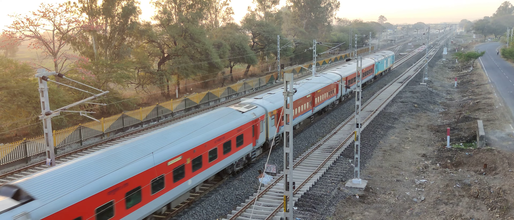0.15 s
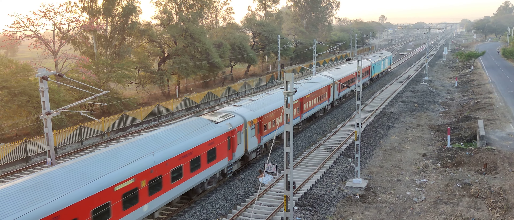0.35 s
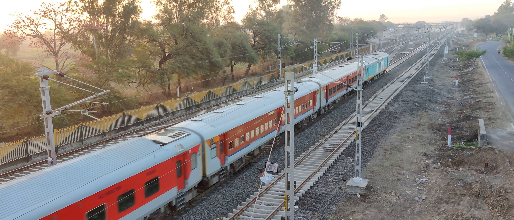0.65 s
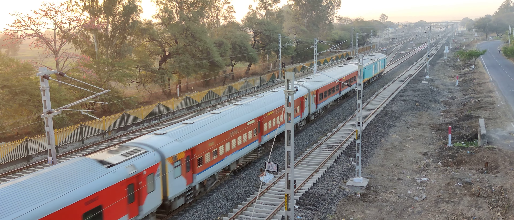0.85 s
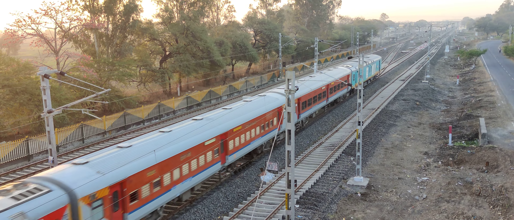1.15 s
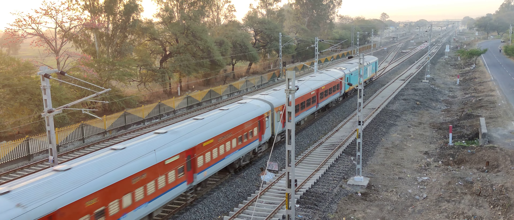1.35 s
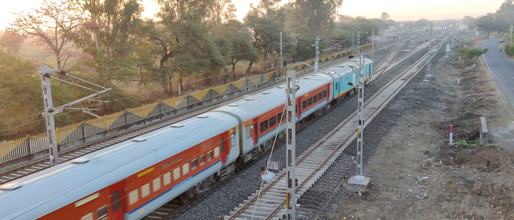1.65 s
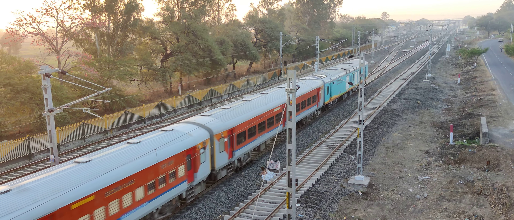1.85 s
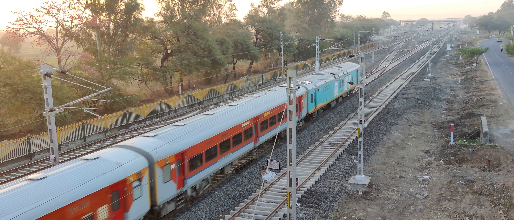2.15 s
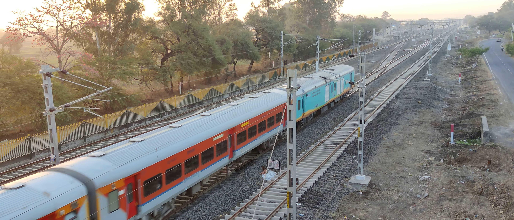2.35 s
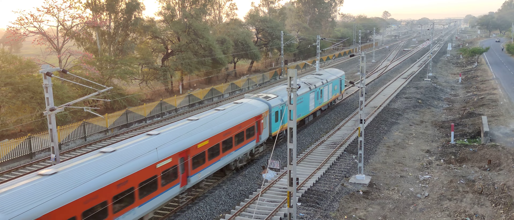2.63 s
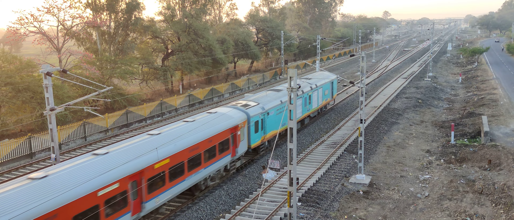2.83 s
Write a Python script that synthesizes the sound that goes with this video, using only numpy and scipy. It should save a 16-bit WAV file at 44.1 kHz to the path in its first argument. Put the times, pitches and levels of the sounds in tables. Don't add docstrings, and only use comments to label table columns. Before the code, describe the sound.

Continuous train rolling noise, deep rumble under rough steel hiss, with irregular paired wheel clacks and rattling throughout, swelling a little past two seconds, then easing; open air, heard from above on a phone.

```python
import sys
import numpy as np
from scipy import signal
from scipy.fft import rfft, irfft
from scipy.io import wavfile
from scipy.ndimage import uniform_filter1d

SR = 44100
rng = np.random.default_rng(int(sys.argv[2]) if len(sys.argv) > 2 else 0)


def gain_from_db(level_db):
    decades = np.asarray(level_db, float) / 20
    return 10 ** decades


def store_pcm(level_fs):
    pcm = np.round(np.clip(level_fs, -1, 1) * 32767).astype(np.int16)
    wavfile.write(sys.argv[1], SR, np.atleast_2d(pcm).T)


N = 131859
PORT_LAG_S = 0.00104


def curve(table, col):
    points = np.array(table, float)
    return np.interp(np.arange(N) / SR, points[:, 0], points[:, col])


def unit(x):
    return x / np.sqrt(np.mean(x ** 2))


def ring(x, hz, width):
    return signal.lfilter(*signal.iirpeak(hz, hz / width, fs=SR), x)


def colour(x, table, share=1):
    points = np.array(table, float)
    hz = np.fft.rfftfreq(N, 1 / SR) + 1
    level_db = np.interp(np.log(hz), np.log(points[:, 0]), points[:, 1])
    return irfft(rfft(x) * gain_from_db(np.multiply.outer(share, level_db)), N)


def walk(rate):
    hold = int(SR / rate)
    steps = np.repeat(rng.standard_normal(N // hold + 1), hold)
    return 0.88 * uniform_filter1d(uniform_filter1d(steps, hold), hold)[:N]


def ports(noise, like, lag_s=0):
    like = np.clip(like, -1, 1)
    shared = np.sqrt((1 + like) / 2) * noise[0]
    opposed = np.sqrt((1 - like) / 2) * noise[1]
    return np.array([np.roll(shared + opposed, int(lag_s * SR)), shared - opposed])


def port_noise(table, like):
    return unit(colour(ports(rng.standard_normal((2, N)), like, PORT_LAG_S), table))


def body(table, drive, flicker_db, rate, grit_db):
    out = 0
    for hz, width, db, like in table:
        rough = rng.standard_normal((2, N)) * gain_from_db(grit_db * rng.standard_normal(N))
        lag_s = PORT_LAG_S * (1150 < hz < 1500)
        rough = ports(unit(rough), like, lag_s) * gain_from_db(flicker_db * walk(rate)) * drive(hz)
        rung = ring(ring(rough, hz, 1.29 * width), hz, 1.29 * width)
        out = out + gain_from_db(db) * np.sqrt(SR / width / 4) * rung
    return out


def thuds(table, db, rise_s, fall_s, pair=1.17):
    events = np.array(table, float)
    start_s, level_db, pitch_hz = events[:, :1], events[:, 1:2], events[:, 2:]
    age_s = np.maximum(np.arange(N) / SR - start_s + rise_s, 0)
    phase = rng.random((len(events), 2)) * 2 * np.pi
    tone = np.sin(2 * np.pi * pitch_hz * age_s + phase[:, :1])
    tone = tone + 0.37 * np.sin(2 * np.pi * pair * pitch_hz * age_s + phase[:, 1:])
    envelope = (1 - np.exp(-age_s / rise_s)) ** 2 * np.exp(-age_s / fall_s)
    return np.sum(gain_from_db(level_db + db) * envelope * tone, axis=0) * 2


# start_s [s], level_db [dB], deep_db [dB], bright_db [dB]
LOAD_CURVE = [
    (0, -25.5, 0.5, 1),
    (.45, -24, -2.5, 0.5),
    (.9, -23.5, -5.5, 3),
    (1.25, -22, -1.5, 2),
    (1.65, -21, 0.5, 3),
    (2.15, -19, -2, 2),
    (2.36, -23, -1, 1.5),
    (2.99, -24.5, 2.5, 1),
]


def rolling_load():
    load = curve(LOAD_CURVE, 1)
    swing = load - np.mean(load)
    deep = curve(LOAD_CURVE, 2) - 0.22 * swing
    high = np.mean(load) + 0.11 * swing + curve(LOAD_CURVE, 3)
    return load, deep, high


# pitch_hz [Hz], width_hz [Hz], level_db [dB], likeness of ports [0-1]
TRACK_MODES = [(30.2, 8, -8, 0.96), (64.9, 12.7, -4, 1), (95, 48, -6.5, 0.98), (133, 94, -3.5, 1),
               (210, 69.5, 0.5, 0.99), (250, 51, -11.5, 0.83), (412, 108, -0.5, 0.97),
               (506.5, 139, -1, 0.96), (617, 100, -11, .93)]


def track_rumble(load, deep, jolts):
    def drive(hz):
        level = gain_from_db(load - 3 + (hz < 110) * deep)
        return level * (jolts if hz > 440 else 1)
    return body(TRACK_MODES, drive, 1.77, 8.9, 3.6)


# start_s [s], level_db [dB], knock_db [dB rel level], hiss_db [dB rel level]
AXLE_CLACKS = [(0.2117, -19, 0, -17), (0.3406, -19, -2.5, -16.5), (0.4874, -40.5, 4, -1),
               (0.5467, -32, 1.5, -9), (0.6818, -27.5, 0.5, -9), (0.7309, -29, 3, -16),
               (0.814, -23.5, -12, -14.5), (1.0041, -28, 3, -16), (1.1543, -27, -5, -17.5),
               (1.2865, -30.5, -0.5, -27), (1.4506, -22, 0, -13), (1.5127, -35, 6, -5.5),
               (1.5858, -27, -1.5, -10), (1.7799, -36.5, 7, -5.5), (1.868, -40, -6.5, -9),
               (1.923, -21.5, -1, -14.5), (2.0524, -26, -3, -6), (2.2414, -27, -2, -14.5),
               (2.3812, -42, 5, -12), (2.6953, -17, -6, -16.5), (2.822, -18.5, -6, -15.5)]


def blows(share, db, lead_s, rise_s, fall_s, tail_s, tail_db):
    clacks = np.array(AXLE_CLACKS, float)
    peak_db = clacks[:, 1] + db
    if share:
        peak_db = peak_db + clacks[:, {"knock": 2, "hiss": 3}[share]]
    age_s = np.arange(N) / SR - (clacks[:, :1] - lead_s)
    swell = np.exp(np.minimum(age_s, 0) / rise_s) * (1 + gain_from_db(tail_db))
    fall = np.exp(-(age_s / fall_s) ** 2) + gain_from_db(tail_db) * np.exp(-np.abs(age_s) / tail_s)
    shape = np.where(age_s < 0, swell, fall)
    return np.sqrt(np.sum((gain_from_db(peak_db)[:, None] * shape) ** 2, axis=0))


# pitch_hz [Hz], width_hz [Hz], level_db [dB], likeness of ports [0-1]
RAIL_MODES = [(768, 146, 2.5, 0.86), (928, 114, -1.5, 0.79), (1034, 62, -3.5, 0.23), (1350, 250, -8, 0.94)]


def rail_knock(high, jolts):
    knock = blows("knock", -9, 0.0051, 0.019, 0.014, 0.12, -1)
    return body(RAIL_MODES, lambda hz: (gain_from_db(high - 14.5) + knock) * jolts, 1.96, 25.06, 4.6)


# pitch_hz [Hz], width_hz [Hz], level_db [dB], likeness of ports [0-1]
WHEEL_MODES = [(1900, 150, -4, 0.8), (1706, 230, -9.5, 0.5), (2500, 150, -9, 0.27), (2741, 140, -9.5, 0.99),
               (3136, 127, -8.5, 0.5), (3988, 170, -10.5, 0.51), (4490, 420, -14, 0.17),
               (5440, 140, -18.5, .5), (5600, 130, -15, .6), (6190, 500, -11.5, 0.2), (6500, 280, -39, .4)]


def wheel_ring(high, treble_jolts):
    clack = blows(None, -12.5, 0.0028, 0.0059, 0.015, 0.13, -1.2)
    return body(WHEEL_MODES, lambda hz: (gain_from_db(high - 20.5) + clack) * treble_jolts, 1.8, 30.14, 2.5)


# pitch_hz [Hz], level_db [dB]
TREAD_SPECTRUM = [(1000, 2), (2000, -1.5), (3500, -0.5), (5500, -5.5), (7000, -13), (8300, -13),
                  (9000, -62)]


def tread_hiss(high, treble_jolts):
    spray = blows("hiss", -7, 0.0096, 0.0043, 0.055, 0.12, 2.5)
    return port_noise(TREAD_SPECTRUM, 0.36) * (gain_from_db(high - 18.5) + spray) * treble_jolts


# start_s [s], level_db [dB], pitch_hz [Hz]
RIM_PINGS = [(0.1964, -28, 1840), (0.2134, -20.5, 2032), (0.2184, -19, 1893), (0.3401, -26.5, 1900),
             (0.3584, -21.5, 1860), (0.5467, -29, 1880), (0.6439, -33, 1900), (0.6818, -23.5, 1870),
             (0.7322, -26, 1960), (0.814, -23.5, 1980), (0.8485, -27, 1900), (1.0066, -30, 1880),
             (1.1568, -29.5, 1920), (1.2885, -35.5, 1950), (1.4506, -21, 1955), (1.5124, -31, 1990),
             (1.5843, -17.5, 1874), (1.6427, -24, 1860), (1.8844, -28, 1810), (1.922, -18, 1853),
             (2.0537, -22, 1840), (2.6874, -21, 1960), (2.6973, -18.5, 1900), (2.7644, -28, 1884),
             (2.822, -26, 1900)]


def rim_pings():
    pings = np.array(RIM_PINGS, float)
    age_s = np.arange(N) / SR - pings[:, :1]
    envelope = np.sum(gain_from_db(pings[:, 1:2] - 1) * (age_s > 0) * np.exp(-np.abs(age_s) / 0.0052), axis=0)
    crack = envelope * ports(rng.standard_normal((2, N)), 0.49)
    for _ in range(3):
        crack = ring(crack, 3360, 4000)
    return thuds(RIM_PINGS, -2, 0.00148, 0.0044, 1.06) + colour(crack, TREAD_SPECTRUM)


# start_s [s], level_db [dB], pitch_hz [Hz]
RAIL_TAPS = [(0.055, -19.5, 570), (0.171, -15, 720), (0.209, -14.5, 900), (0.279, -16, 607),
             (0.344, -24, 687), (0.381, -11.5, 775), (0.52, -14.5, 812), (0.817, -19, 558),
             (0.87, -17, 797), (0.993, -12, 535), (1.01, -11.5, 768), (1.086, -19, 577), (1.102, -15, 720),
             (1.15, -13.5, 751), (1.288, -20, 710), (1.378, -22, 584), (1.441, -19.5, 582),
             (1.521, -21.5, 716), (1.557, -21.5, 590), (1.583, -12, 743), (1.625, -13, 656),
             (1.672, -20.5, 728), (1.766, -16.5, 742), (1.871, -12.5, 518), (1.896, -20, 828),
             (1.919, -16.5, 782), (2.052, -13, 711), (2.139, -19, 556), (2.196, -20, 534),
             (2.243, -9.5, 562), (2.306, -22.5, 584), (2.532, -24.5, 770), (2.589, -24, 800),
             (2.664, -15, 785), (2.691, -18, 1049), (2.814, -11, 933), (2.888, -16.5, 602)]


def rail_taps():
    return thuds(RAIL_TAPS, -5, 0.00154, 0.0061)


# start_s [s], level_db [dB], pitch_hz [Hz]
SLEEPER_THUDS = [(0.263, -17, 449), (0.328, -13.5, 507), (0.388, -11.5, 497), (0.42, -13, 438),
                 (0.531, -7.5, 466), (0.764, -15.5, 500), (0.847, -15.5, 396), (1.02, -14, 421),
                 (1.127, -12, 428), (1.271, -6, 401), (1.338, -17.5, 377), (1.41, -5.5, 418),
                 (1.479, -18, 472), (1.508, -15.5, 537), (1.775, -17, 363), (1.822, -15, 536),
                 (1.871, -18, 538), (1.911, -12, 498), (1.96, -8.5, 430), (2.108, -7, 427),
                 (2.193, -33, 510), (2.743, -16, 491), (2.868, -17.5, 444)]
# start_s [s], level_db [dB], pitch_hz [Hz]
BOGIE_BUMPS = [(0.049, -13.5, 201), (0.145, -19.5, 195), (0.463, -12.5, 210), (0.516, -25, 211),
               (0.67, -21.5, 197), (0.935, -22.5, 195), (1.004, -19, 187.6), (1.158, -10, 180.5),
               (1.301, -15, 191), (1.497, -18, 180), (1.671, -13.5, 244), (1.746, -11.5, 170),
               (2.044, -10.5, 235), (2.203, -9.5, 206.5), (2.523, -13.5, 217), (2.585, -16.5, 242),
               (2.754, -33, 187), (2.919, -25, 239)]
# start_s [s], level_db [dB], pitch_hz [Hz]
FLOOR_BOOMS = [(0.052, -27.5, 68), (0.332, -19, 41.4), (0.509, -18.5, 63), (0.763, -15, 61.3),
               (1.013, -14, 72.6), (1.101, -19.5, 75), (1.306, -19.5, 115), (1.625, -30, 65.6),
               (1.796, -20, 62.2), (2.258, -20.5, 96.7), (2.437, -13, 78), (2.674, -36, 79)]


def dull_blows():
    sleepers = thuds(SLEEPER_THUDS, 0.5, 0.00304, 0.0062)
    bogies = thuds(BOGIE_BUMPS, -4.5, 0.00796, 0.022)
    floors = thuds(FLOOR_BOOMS, -4.5, 0.015, 0.028)
    return sleepers + bogies + floors


# pitch_hz [Hz], level_db [dB]
SCRAPE_SPECTRUM = [(3500, -13.5), (5200, -4.5), (6500, -3.5), (7200, -13), (8300, -9), (8800, -55.5)]


def flange_scrape():
    return port_noise(SCRAPE_SPECTRUM, 0.63) * blows("hiss", -6, 0.035, 0.0011, 0.078, 0.08, -10)


def rattle():
    per_s, decay_s, level_db = 90, 0.003, -10
    jolt = (rng.random(N) < per_s / SR) * rng.exponential(size=N)
    return unit(1 + gain_from_db(level_db) * signal.lfilter([1], [1, -np.exp(-1 / (decay_s * SR))], jolt))


# pitch_hz [Hz], level_db [dB]
AIR_SPECTRUM = [(8000, -23), (8500, -1.5), (8900, -9), (11000, -9), (12500, -10), (13000, -31.5)]
# start_s [s], level_db [dB], length_s [s]
FLANGE_SQUEAKS = [(.21, -68, 0.043), (.33, -71, .04), (0.494, -59.5, .06), (.67, -72, .04), (.81, -69, .04),
                  (1.43, -73, .04), (1.57, -71, 0.064), (1.9, -69, .04), (2.05, -71, .04), (2.69, -67, .04),
                  (2.83, -64, 0.054)]


def flange_squeaks():
    events, t = np.array(FLANGE_SQUEAKS, float), np.arange(N) / SR
    swells = gain_from_db(events[:, 1:2] + 9.5) * np.exp(-((t - events[:, :1]) / events[:, 2:]) ** 2)
    tick = gain_from_db(-45) * np.exp(-np.abs(t - 0.0404) / 0.001)
    return port_noise(AIR_SPECTRUM, 0.3) * (np.sum(swells, axis=0) + gain_from_db(-63.5) + tick)


def scene():
    load, deep, high = rolling_load()
    jolts = rattle()
    treble_jolts = jolts ** 0.3
    rolling = track_rumble(load, deep, jolts) + rail_knock(high, jolts)
    steel = wheel_ring(high, treble_jolts) + tread_hiss(high, treble_jolts)
    struck = rim_pings() + rail_taps() + dull_blows()
    return rolling + steel + struck + flange_scrape() + flange_squeaks()


def sparse_top(x):
    def smooth(v):
        return uniform_filter1d(uniform_filter1d(v, size=13, axis=-2), size=3, axis=-1)
    hz, _, lines = signal.stft(x, SR, nperseg=2048)
    size = np.abs(lines)
    patches_db = 4 * unit(smooth(rng.standard_normal(lines.shape[1:])))
    gap_db = 7 * np.exp(-((hz[:, None] - 9100) / 450) ** 2)
    threshold = 1.65 * smooth(size) * gain_from_db(patches_db + gap_db)
    kept = (size > threshold) | (hz < 7700)[:, None]
    return signal.istft(lines * kept, SR, nperseg=2048)[1][:, :N]


def top_cut(x):
    return signal.sosfilt(signal.butter(12, 13440, fs=SR, output="sos"), x)


# pitch_hz [Hz], level_db [dB]
PORT_SHADE = [(50, 0), (1400, -1), (2300, -6), (3200, -1), (4600, -8), (5700, 1), (6700, -21.5),
              (8500, 2.5)]


def record(dry):
    x = colour(np.tanh(1.29 * dry) / 1.287, PORT_SHADE, np.array([0.5, -0.5]))
    bass = signal.butter(2, 110, fs=SR, output="sos")
    x = x - signal.sosfiltfilt(bass, x - x.mean(axis=0))
    x = colour(x, [(20, -7), (35, 1), (7000, -2), (7600, -5), (8400, -6), (13300, -10), (13450, -62.5)])
    mix = sparse_top(x)
    return top_cut(mix)


dry = scene()
out = record(dry)
store_pcm(out)
```